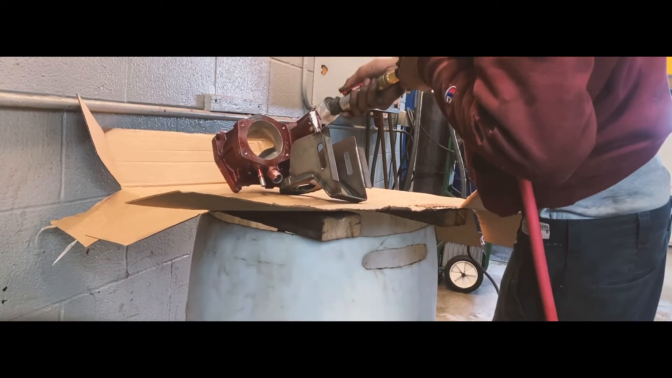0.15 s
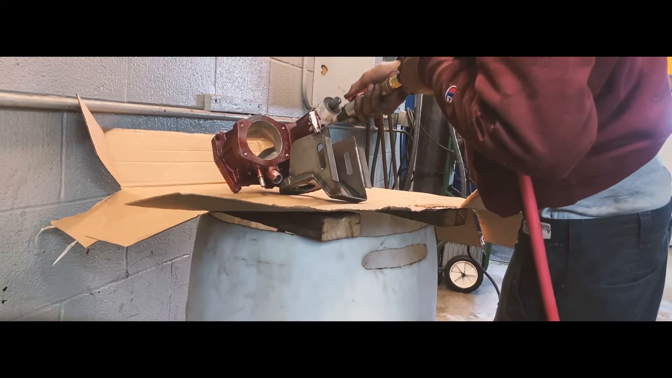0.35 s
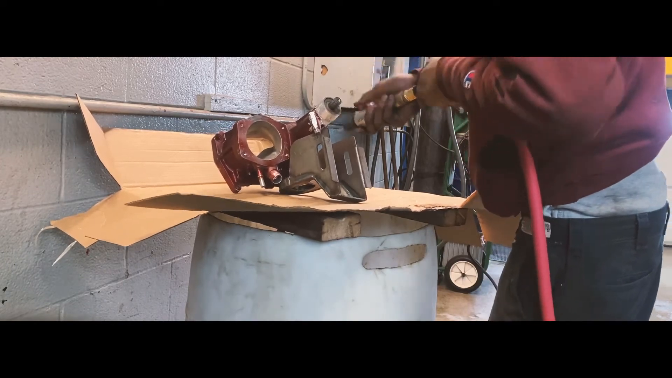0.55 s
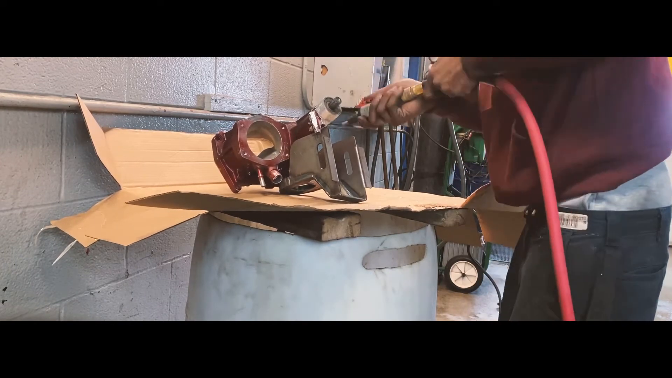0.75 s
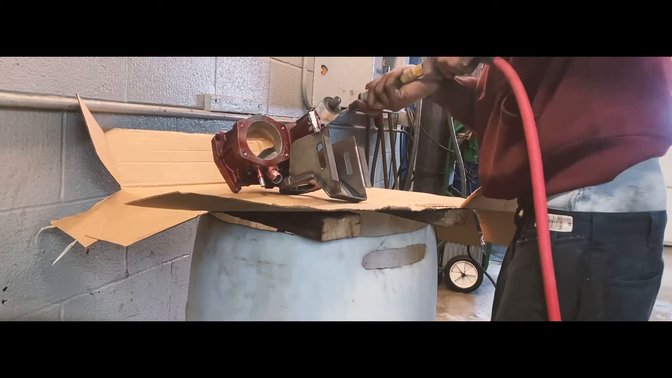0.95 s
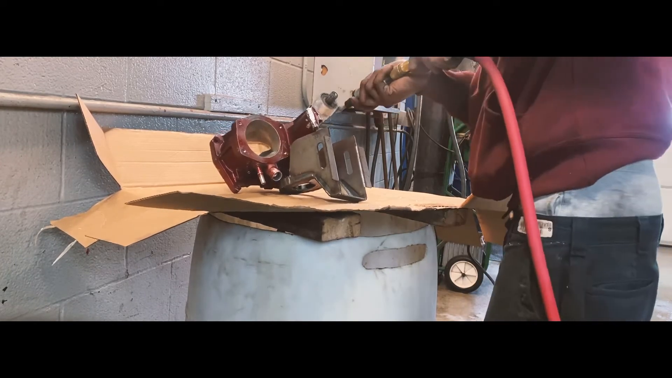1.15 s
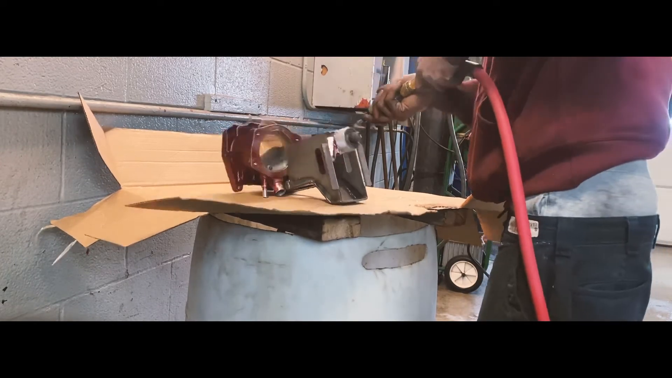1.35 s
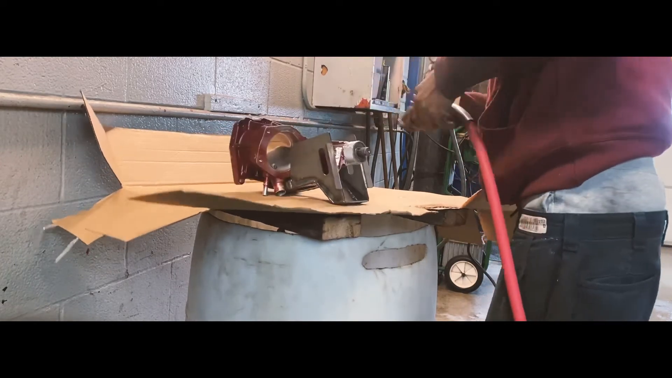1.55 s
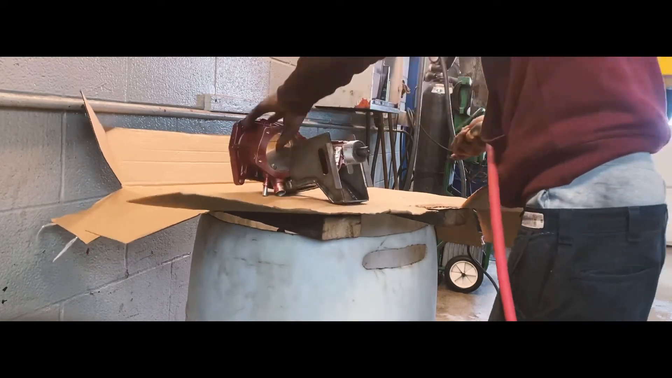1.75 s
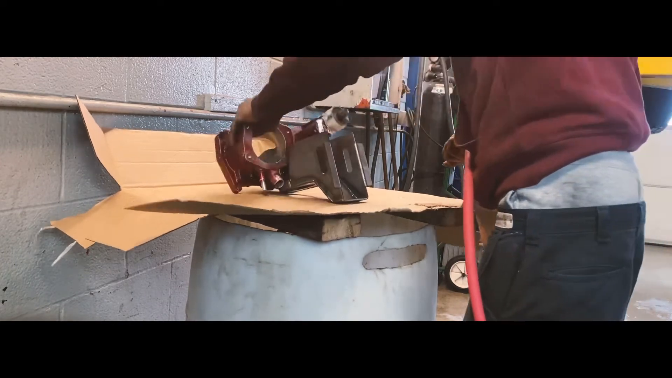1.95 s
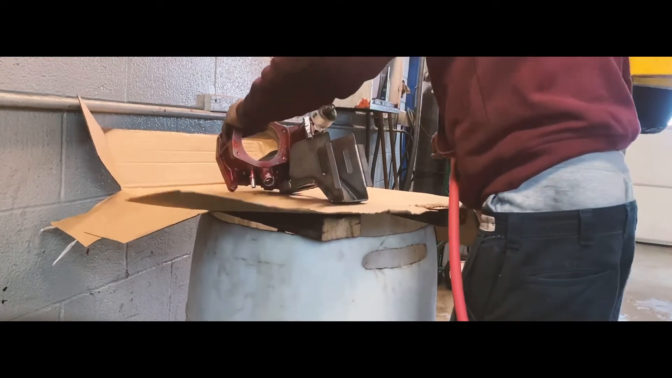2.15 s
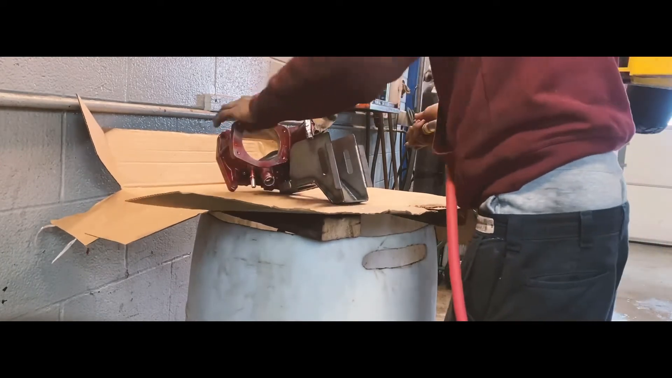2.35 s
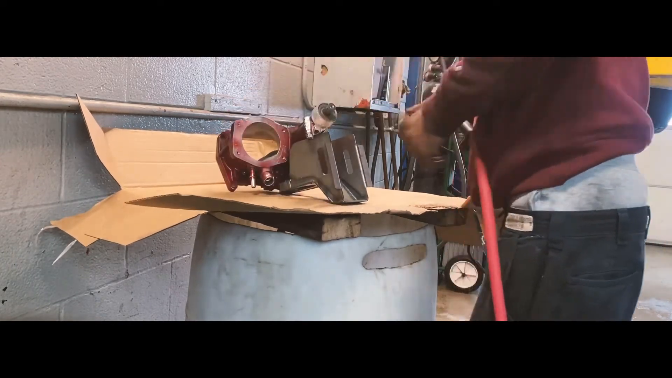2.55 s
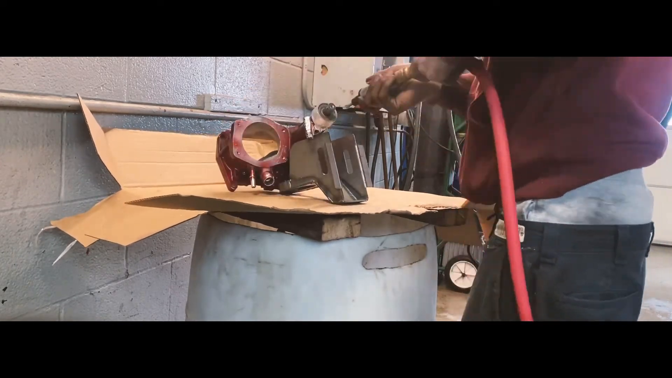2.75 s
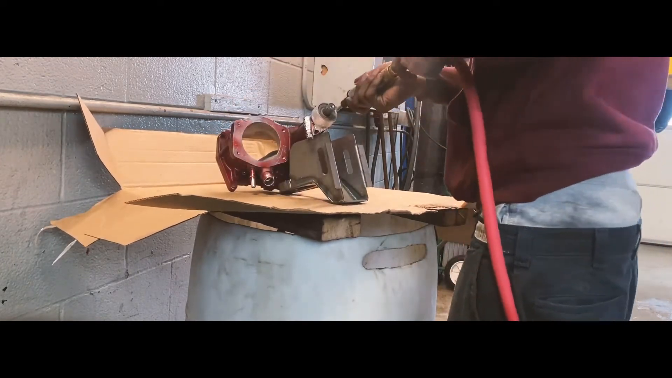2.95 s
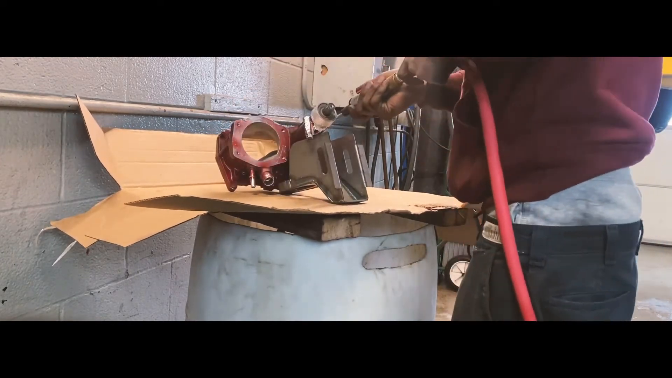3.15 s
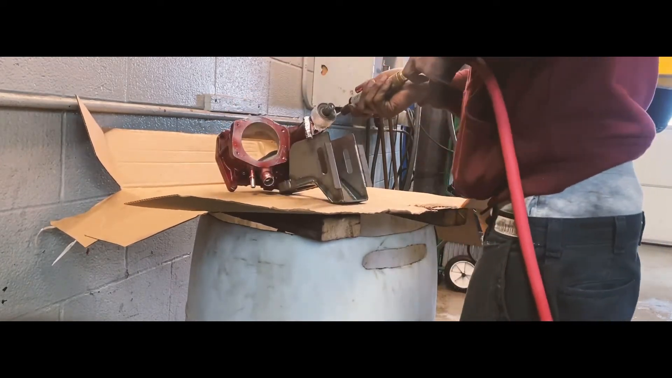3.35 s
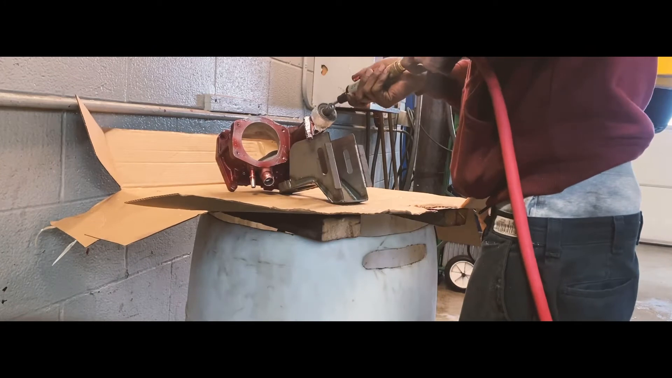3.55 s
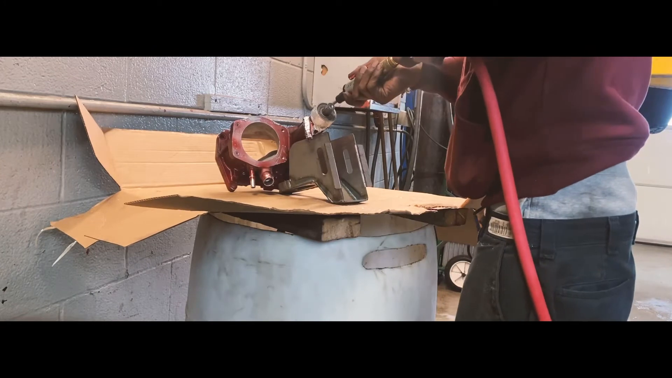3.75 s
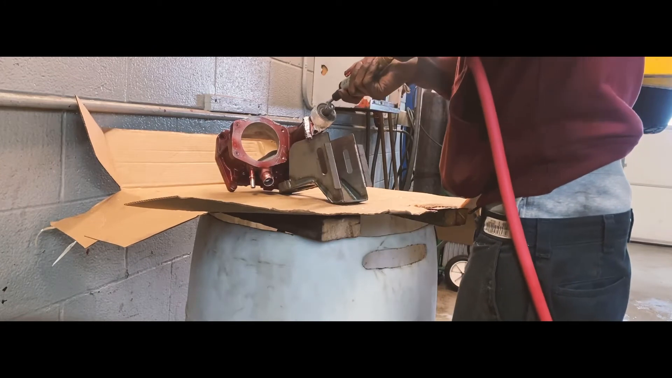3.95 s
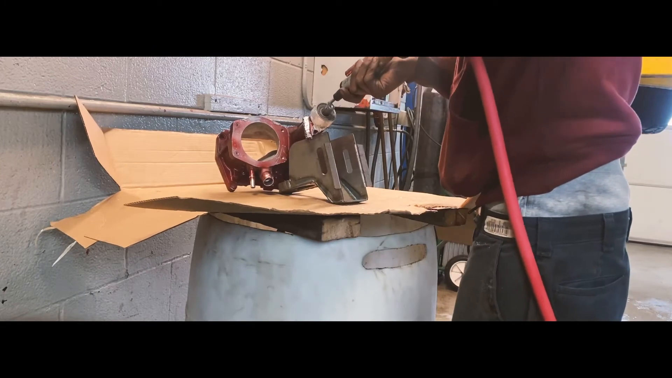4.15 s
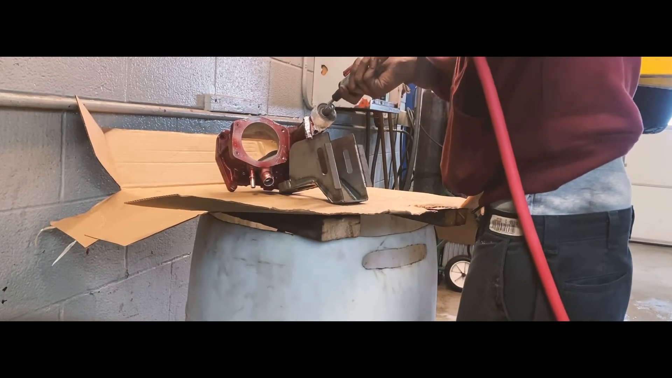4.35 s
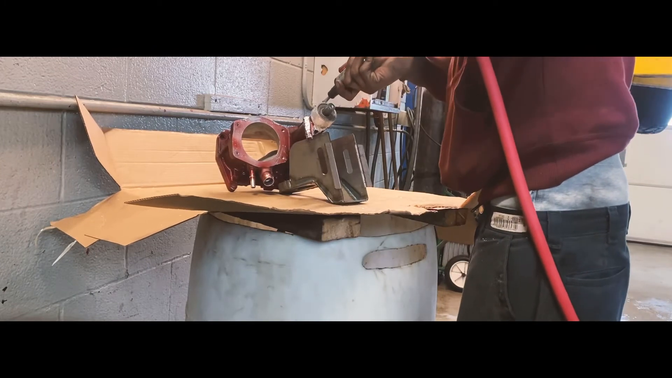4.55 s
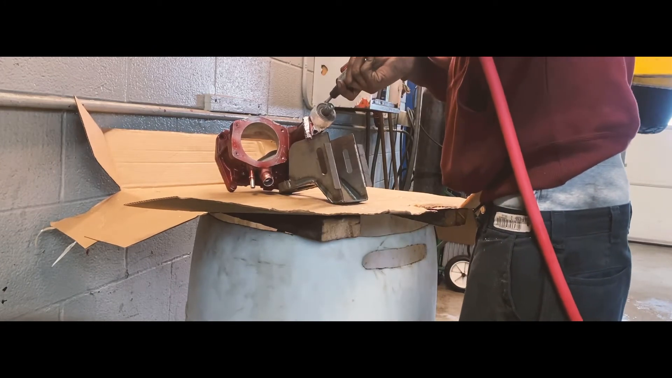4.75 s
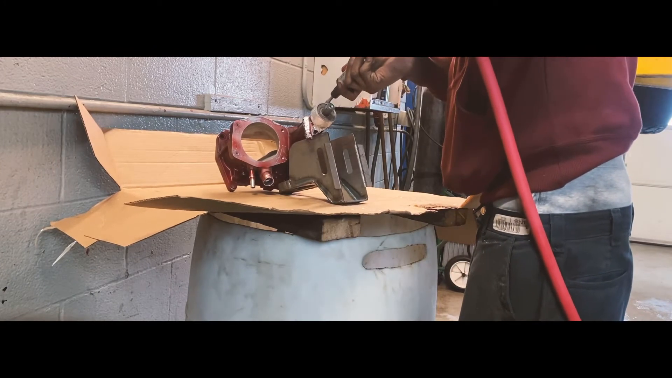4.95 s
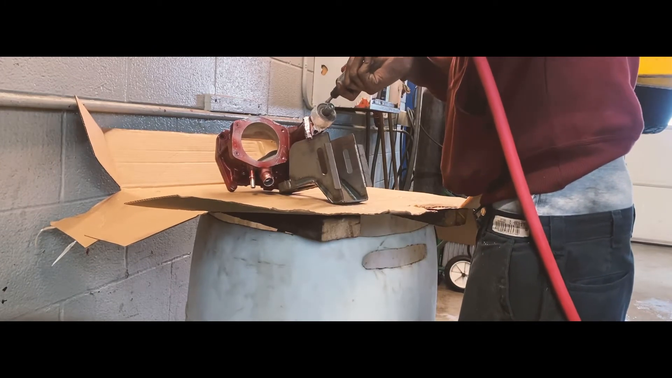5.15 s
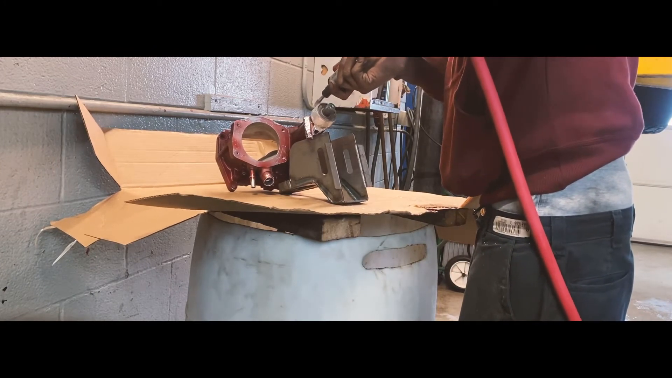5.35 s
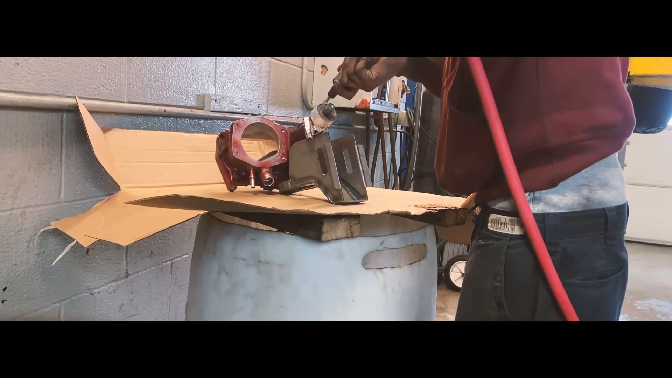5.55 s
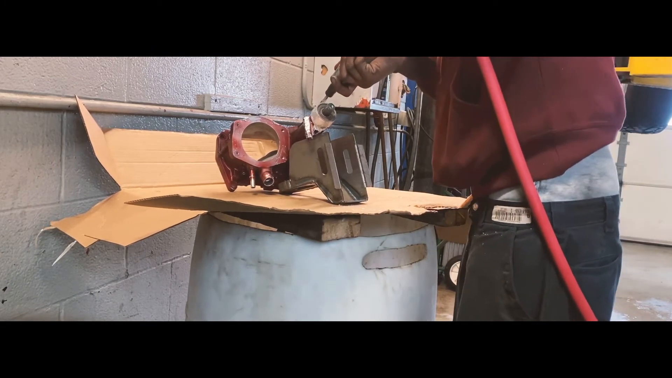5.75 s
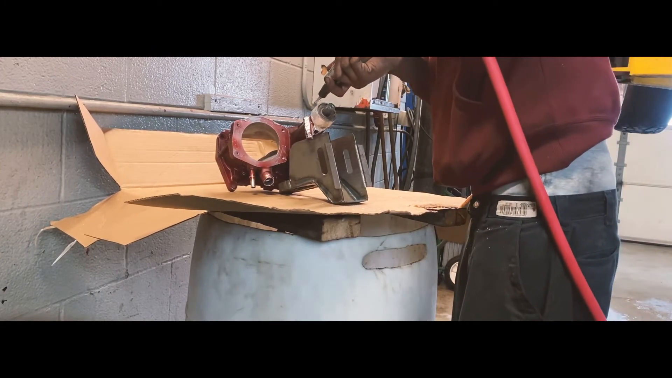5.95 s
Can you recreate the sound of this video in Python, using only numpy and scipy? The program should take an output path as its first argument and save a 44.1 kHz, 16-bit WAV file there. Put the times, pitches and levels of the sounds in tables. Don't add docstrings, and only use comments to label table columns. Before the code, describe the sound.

A pneumatic die grinder cuts metal, heard closely in stereo with short room reflections. Its nasal whine and strong airy hiss run just over a second, dipping briefly, then shut off with a breathy puff. Low building rumble remains; cardboard scrapes, the casting chirps, and a hard little clack lands with a dull drum thump. Then the grinder restarts abruptly and continues, wavering slightly.

```python
import sys
import numpy as np
from scipy import signal
from scipy.fft import rfft, irfft, next_fast_len
from scipy.io import wavfile
from scipy.ndimage import uniform_filter1d, map_coordinates

SR = 44100
rng = np.random.default_rng(int(sys.argv[2]) if len(sys.argv) > 2 else 0)


def ratio(d):
    e = np.asarray(d, float) / 20
    return 10 ** e


def put_to_file(sound):
    columns = np.atleast_2d(sound).T
    safe = np.clip(columns, -1, 1)
    whole_steps = np.round(safe * 32767)
    wavfile.write(sys.argv[1], SR, whole_steps.astype(np.int16))


N = 265041

# (time [s], vane rate [Hz], air flow [dB], whine over the flow [dB])
FIRST_RUN = [
    (0.0, 1595, -30, -14),
    (0.329, 1526, -30, -13),
    (0.457, 1620, -30, -12),
    (0.508, 1288, -35.5, -6),
    (0.58, 1216, -34.5, -6.5),
    (0.744, 1246, -33.5, -6.5),
    (0.875, 1463, -29.5, -10),
    (1.08, 1507, -30, -11),
    (1.22, 1559, -30, -9),
]
SECOND_RUN = [(2.525, 1191, -35, -4), (2.567, 1256, -34, 0), (2.6, 1093, -38.5, 5.5),
              (2.677, 1103, -32.5, 0), (2.739, 1507, -26, -11.5), (2.81, 1553, -26.5, -7.5),
              (3.088, 1513, -28.5, -7.5), (3.338, 1480, -28.5, -11.5), (3.55, 1581, -28.5, -8.5),
              (3.952, 1503, -29, -9.5), (4.148, 1550, -28.5, -10), (4.222, 1644, -29.5, -12),
              (4.599, 1655, -28.5, -16.5), (4.76, 1573, -28.5, -9), (4.941, 1523, -29, -10),
              (5.02, 1586, -29.5, -10), (5.568, 1526, -29.5, -11), (6.01, 1528, -29, -7.5)]
# (multiple of the vane rate, level over the flow [dB])
WEAK_OVERTONES = [(4, -15), (5, -19)]
# (frequency [Hz], level over the flow [dB])
OCTAVE = [(2150, -3), (2400, -8.5), (2650, -8.5), (2950, -6), (3120, -10), (3300, -13.5)]
# (time [s], width [s], depth [dB])
CANCELLED = [
    (0.32, .02, 9),
    (0.71, .05, 9),
    (3.32, .02, 5),
    (4.63, .025, 6),
    (5.6, .025, 16),
]
# (time [s], length [s], multiple of the vane rate, level [dB])
UNEVEN_VANES = [
    (0.84, 0.34, .5, -49.5),
    (1.059, 0.19, .75, -58),
    (2.838, 0.23, .5, -44),
    (4.179, 0.61, .75, -42),
    (4.602, .4, .5, -65),
]
# (frequency [Hz], level per Hz [dB])
HISS = [(300, -40), (700, -14), (880, -14), (1080, -9), (1400, -15.5), (1750, -12), (2200, -9),
        (3700, -8.5), (5300, -3), (6800, -5.8), (7950, 0), (8550, -1.3), (9250, 0), (9900, -2.8),
        (11800, -3.7), (13800, -9.2), (15300, -5.6), (16000, -6.5)]
# (frequency [Hz], level per Hz [dB])
ROAR = [(60, -12), (130, 3), (300, 0), (600, 3), (1100, -23.5), (1500, -15.5), (3000, -9)]
# (frequency [Hz], likeness [0-1])
ALIKE = [(60, .9), (180, .9), (350, .7), (700, .2), (1050, .5), (1500, .05), (2300, .7), (3000, .68),
         (3600, .85), (4200, .72), (5200, .7), (6300, .8), (7000, .86), (8300, .996), (9600, .996),
         (15000, .97)]
# (frequency [Hz], phase [radians])
LEAD = [(3800, 0), (5200, -.95), (6500, -.2), (7400, .3), (8650, 2.85), (9300, 3.35), (10800, 6),
        (11400, 6.5), (12750, 9.05), (13650, 9.7), (15000, 12.3), (15800, 12.8)]
# (frequency [Hz], left minus right [dB])
BALANCE = [(60, .5), (400, 1), (3000, 1.8), (5500, 1.7), (7000, .3), (15000, 0)]
# (frequency [Hz], time to fall 60 dB [s])
WALLS = [(100, 0.81), (1000, 0.41), (4000, 0.44), (12000, 0.19)]
# (frequency [Hz], level per Hz [dB])
RUMBLE = [(12, -36.5), (20, -12.5), (49, -1.5), (65, -3.5), (103, -8), (119, -32.5), (200, -44), (260, -63),
          (440, -120)]
# (frequency [Hz], level per Hz [dB])
DRAUGHT = [(88, -37), (150, -3.5), (371, -11), (590, -21), (647, -21.5), (1260, -14.5), (1490, -35.5),
           (1890, -21.5), (4270, -34), (5050, -32.5), (7580, -49.5), (12500, -44), (16200, -68.5),
           (22000, -120)]
# (time [s], level [dB], pitch [Hz], time to fall 60 dB [s])
BOOMS = [
    (1.171, -34.5, 60, 0.11),
    (1.212, -39.5, 157, 0.18),
    (1.319, -40.5, 60, 0.28),
    (1.328, -45, 262.4, 0.15),
    (1.862, -47.5, 233, 0.1),
    (1.86, -35, 71, 0.34),
    (2.045, -47, 160, 0.24),
    (2.062, -36.5, 69, 0.47),
    (2.494, -42, 132, 0.12),
]
# (time [s], length [s], pitch [Hz], width [Hz], level [dB])
VENTS = [
    (1.232, 0.043, 950, 400, -35),
    (1.24, 0.1, 1040, 500, -41.5),
    (1.261, 0.11, 1850, 500, -46.5),
    (1.271, 0.065, 2920, 902, -46),
    (1.31, 0.11, 2280, 201, -49.5),
    (2.485, 0.083, 349.5, 405, -46),
]
# (time [s], length [s], level at the start [dB], level at the end [dB])
SLIPS = [
    (1.808, .012, -64, -77),
    (1.82, 0.18, -69.5, -55),
    (2.03, 0.02, -55, -51),
]
# (frequency [Hz], level per Hz [dB])
GRIT = [(200, -8), (600, -3.5), (1800, -3.5), (4000, -14), (8000, -27), (15000, -30)]
# (time [s], length [s], pitch [Hz], width [Hz], level [dB])
SQUEAKS = [(1.812, 0.015, 7500, 4900, -70.5), (1.825, 0.22, 11000, 4000, -78),
           (1.838, 0.049, 6730, 890, -69), (1.855, 0.13, 2230, 100, -61.5), (1.893, 0.068, 7040, 90, -74),
           (1.907, .05, 5000, 90, -70), (1.912, .05, 3280, 100, -73), (1.9, 0.088, 1196, 70, -61),
           (1.96, 0.083, 1160, 70, -53.5), (1.93, 0.079, 1770, 150, -68), (1.935, .08, 2770, 250, -63),
           (1.961, 0.037, 3870, 90, -64), (1.97, 0.044, 6550, 150, -77)]
# (time [s], peak level [dB])
KNOCKS = [
    (2.041, -26.5),
    (2.045, -24.5),
    (2.049, -42),
    (2.061, -29),
]
# (pitch [Hz], level [dB], time to fall 60 dB [s])
CASTING = [(1180, -2, .07), (1700, -3, .04), (1950, -2, .05), (2200, 0, .05), (2600, -7, .04),
           (3700, -16, .03), (6700, -22, .06), (8300, -16, .1)]

STOP_S, STOP_HZ, STOP_FLOW_DB = FIRST_RUN[-1][:3]
START_S, START_HZ, START_FLOW_DB, START_WHINE_DB = SECOND_RUN[0]
OPENING_S = .042


def unit(x):
    return x / np.sqrt(np.mean(x ** 2) + 1e-20)


def along(points, hz):
    f, v = np.transpose(points)
    return np.interp(np.log(hz + 1), np.log(f + 1), v)


def curves(rows):
    s, *columns = np.transpose(rows)
    return [np.interp(np.arange(N) / SR, s, column) for column in columns]


def wobble(rate):
    points = rng.standard_normal(int(N * rate / SR) + 4)
    return map_coordinates(points, [np.arange(N) * rate / SR])


def filtered(x, response):
    m = next_fast_len(N + SR // 2)
    return irfft(rfft(x, m) * response(np.fft.rfftfreq(m, 1 / SR)), m)[..., :N]


def coloured(x, spectrum):
    return unit(filtered(x, lambda hz: ratio(along(spectrum, hz))))


def motor():
    t = np.arange(N) / SR
    vane_hz, flow_db, whine_db = curves(FIRST_RUN + SECOND_RUN)
    dips_db = sum(db * np.exp(-((t - s) / width) ** 2) for s, width, db in CANCELLED)
    whine_db = whine_db + flow_db - dips_db
    octave_db = flow_db + along(OCTAVE, 2 * vane_hz)

    shut = t - STOP_S
    opened = 1 + (t - START_S) / OPENING_S
    coasting = (shut > 0) & (opened <= 0)
    rising = (opened > 0) & (opened < 1)
    opening_db = 20 * np.log10(np.clip(opened, 1e-6, 1))
    silent_db = -120 * (shut > .055)

    cough_s, cough_db, cough_fall = 1.234, -26, 694
    coast_hz, brake = 1030, 15000
    late = t - cough_s
    slowing_hz = coast_hz - (STOP_HZ - coast_hz) * late / (cough_s - STOP_S)
    stop_hz = np.maximum(np.where(late < 0, slowing_hz, coast_hz - brake * late), 100)
    stop_whine_db = cough_db - cough_fall * late * np.where(late < 0, -12, 1) + silent_db
    stop_flow_db = STOP_FLOW_DB - 657 * shut + silent_db
    start_hz = 420 + (START_HZ - 420) * opened ** 2
    start_whine_db = START_FLOW_DB + START_WHINE_DB + 0.48 * opening_db

    def pick(run, stop, start):
        return np.where(coasting, stop, np.where(rising, start, run))
    return (pick(vane_hz, stop_hz, start_hz),
            pick(whine_db, stop_whine_db, start_whine_db),
            pick(octave_db, -120, octave_db + 4 * opening_db),
            pick(flow_db, stop_flow_db, START_FLOW_DB + opening_db))


def uneven(quarters, flow_db):
    t = np.arange(N) / SR
    swells = 0
    for s, length, multiple, db in UNEVEN_VANES:
        if round(4 * multiple) == quarters:
            swells = swells + ratio(db) * np.sin(np.pi * np.clip((t - s) / length, 0, 1))
    return 20 * np.log10(ratio(flow_db - 39.5) + abs(swells))


def vane_tone(turn, shared_db, ear_db):
    flicker = ratio(2.73 * wobble(60))
    apart = np.sqrt(np.clip(ratio(ear_db) ** 2 - ratio(shared_db) ** 2, 0, None))
    return flicker * np.array([ratio(shared_db) * np.sin(turn), apart * np.cos(turn)])


def patchy(x, patchy_db):
    z = signal.stft(x, nperseg=512)[2]
    across_pitch = uniform_filter1d(rng.standard_normal(z.shape[1:]), size=2, axis=0)
    field = uniform_filter1d(across_pitch, size=50, axis=1)
    return signal.istft(z * ratio(patchy_db * unit(field)), nperseg=512)[1][:, :N]


def grinder():
    vane_hz, whine_db, octave_db, flow_db = motor()
    octave_db = octave_db + 1.8 * wobble(9)
    half_db, three_quarter_db = uneven(2, flow_db), uneven(3, flow_db)
    turn = 2 * np.pi * np.cumsum(vane_hz * (1 + 0.00599 * wobble(40))) / SR
    chatter = ratio(0.16 * wobble(12) + 0.19 * wobble(120) + 0.69 * wobble(500) + 1.3 * wobble(2000))
    puffs = 1 + 0.1 * np.cos(turn) + 0.057 * np.cos(turn / 4)
    unsteady = 1 + np.clip(abs(np.gradient(vane_hz)) * SR / 6000, 0, 1.6)

    def wander(k):
        return 3 * wobble(2) + .7 * np.sqrt(k) * wobble(45) + .5 * unsteady ** 1.3 * wobble(160)

    def overtone(k, db):
        return ratio(db + 2.38 * np.sqrt(k) * wobble(60)) * np.sin(k * turn + wander(k))

    whine, air = [], []
    for _ in range(2):
        tone = overtone(.5, half_db) + overtone(.75, three_quarter_db)
        tone += overtone(2, octave_db + 2.5 - 3 * (unsteady - 1))
        for k, db in WEAK_OVERTONES:
            tone += overtone(k, flow_db + db)
        whine.append(tone)
        hiss = coloured(chatter * puffs * rng.standard_normal(N), HISS)
        roar = coloured(chatter * rng.standard_normal(N), ROAR)
        air.append(ratio(flow_db + 5.5) * hiss + ratio(flow_db - 20) * roar)
    main = vane_tone(turn + 0.93 * wander(0.89), whine_db + 3.5, flow_db - 3.0)
    return np.array(whine) + main, patchy(np.array(air), patchy_db=1.5)


def ports(a, b):
    def spread(hz):
        return np.arccos(np.clip(along(ALIKE, hz), 0, 1)) / 2

    def both(hz):
        tilt = ratio(along(BALANCE, hz) / 2) * np.exp(-.5j * along(LEAD, hz))
        return np.array([tilt, 1 / tilt])
    sides = np.array([[1], [-1]])
    shared = filtered(a, lambda hz: np.cos(spread(hz)) * both(hz))
    return shared + filtered(b, lambda hz: sides * np.sin(spread(hz)) * both(hz))


def room(x, count=4):
    out, phase = 0, np.arange(N) / SR / 0.297
    for k in range(count):
        hz, t, z = signal.stft(rng.standard_normal((2, SR // 2)), SR, nperseg=256)
        fading = ratio(-60 * t / along(WALLS, hz)[:, None])
        tail = signal.istft(z * fading, SR, nperseg=256)[1]
        tail = tail / np.linalg.norm(tail[0])
        share = np.sqrt(np.clip(1 - abs((phase - k + 1) % count - 1), 0, 1))
        fed = np.pad(x * share, ((0, 0), (300, 0)))
        out = out + signal.fftconvolve(fed, tail, axes=1)[:, :N]
    return out


def shop():
    t, flow = np.arange(N) / SR, ratio(motor()[3] + 1.5 * wobble(3))
    pause = np.clip((t - STOP_S) / 0.079, 0, 1) * np.clip((START_S - t) / OPENING_S, 0, 1)
    low = ratio(-57.5) * pause + ratio(-35) * flow
    high = ratio(-65.5) * pause + ratio(-35.5) * flow
    noise = rng.standard_normal((4, N))
    hum = 0.2 * np.sin(2 * np.pi * 61 * t + wobble(2))
    rumble = low * ratio(1.2 * wobble(3.1)) * (coloured(noise[:2], RUMBLE) + hum)
    return ports(*rumble) + high * coloured(0.69 * noise[2] + 0.7 * noise[[3, 0]], DRAUGHT)


def drum():
    out, t = np.zeros(N + SR), np.arange(SR // 2) / SR
    for s, db, hz, t60 in BOOMS:
        ring = np.sin(2 * np.pi * hz * t) + 0.31 * np.sin(2 * np.pi * 1.45 * hz * t)
        onset = 1 - np.exp(-t / 0.0033)
        out[round(s * SR):][:len(t)] -= ratio(db - 60 * t / t60) * onset * ring
    return out[:N]


def resonant(hz, width_hz, size):
    peak = signal.iirpeak(hz, hz / width_hz, SR)
    once = signal.lfilter(*peak, rng.standard_normal(size + 2000))
    return unit(signal.lfilter(*peak, once)[2000:])


def swells(events):
    out = np.zeros(N)
    for s, length, hz, width_hz, db in events:
        swell = np.sin(np.pi * np.linspace(0, 1, round(length * SR)) ** 0.31)
        out[round(s * SR):][:len(swell)] += ratio(db) * swell * resonant(hz, width_hz, size=len(swell))
    return out


def drag(grit):
    level = np.zeros(N)
    for s, length, first_db, last_db in SLIPS:
        size = round(length * SR)
        fade = signal.windows.tukey(size, .2)
        level[round(s * SR):][:size] += ratio(np.linspace(first_db, last_db, size)) * fade
    return level * ratio(1.0 * wobble(90)) * grit


def knocks(grit):
    out, t = np.zeros(N + SR), np.arange(SR // 2) / SR
    for s, db in KNOCKS:
        ring = 0
        for hz, level, t60 in CASTING:
            ring = ring + ratio(level + rng.normal(0, 2.3) - 60 * t / t60) * np.sin(2 * np.pi * hz * t)
        crack = 1.27 * ratio(-60 * t / 0.044) * np.roll(grit, rng.integers(N))[:len(t)]
        out[round(s * SR):][:len(t)] += ratio(db - 12) * (ring + crack)
    return out[:N]


def handling():
    grit = coloured(rng.standard_normal(N), GRIT)
    return swells(VENTS) + drag(grit) + swells(SQUEAKS) + knocks(grit)


def scene():
    whine, air = grinder()
    hands = handling() * np.ones((2, 1))
    echoes = room(ratio(-17) * whine + ratio(-12.0) * air + ratio(-7.5) * hands)
    near = whine + air + hands * [[1], [.3]]
    return ports(*(near + echoes)) + drum() + shop()


def roll_off(x):
    return signal.sosfilt(signal.butter(12, 17100, fs=SR, output="sos"), x)


def record(dry):
    finished = filtered(dry, lambda hz: np.clip((15790 - hz) / 90, 0, 1))
    return roll_off(finished)


dry = scene()
out = record(dry)
put_to_file(out)
```